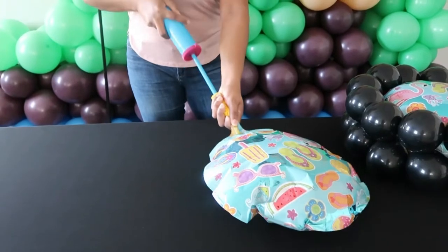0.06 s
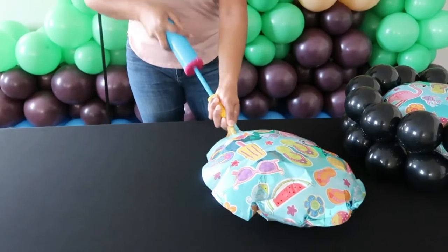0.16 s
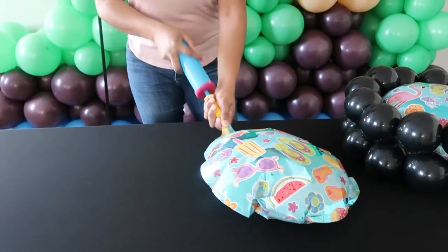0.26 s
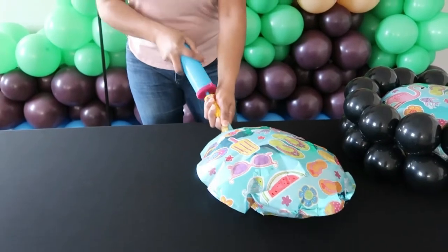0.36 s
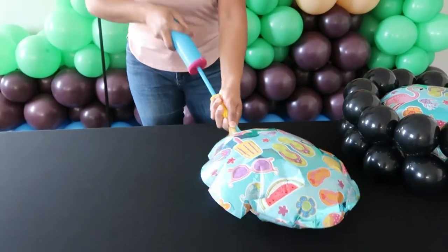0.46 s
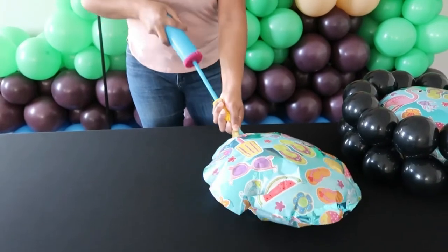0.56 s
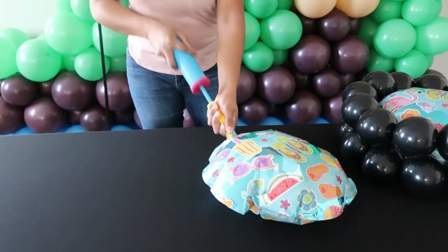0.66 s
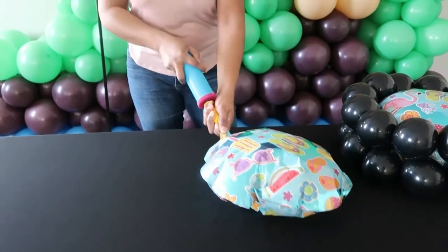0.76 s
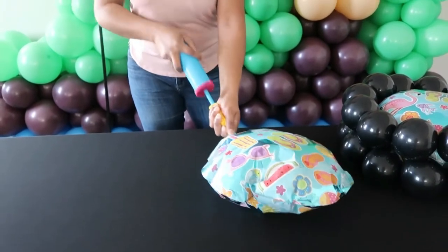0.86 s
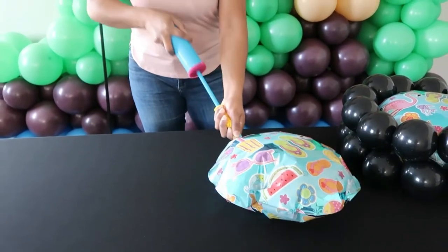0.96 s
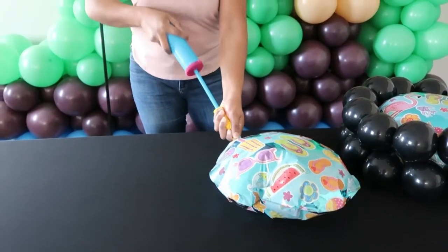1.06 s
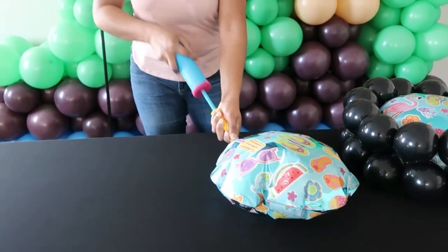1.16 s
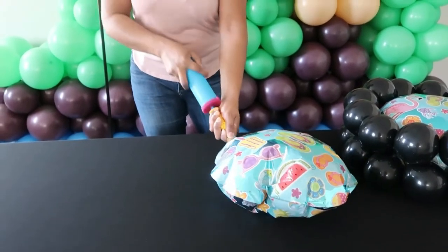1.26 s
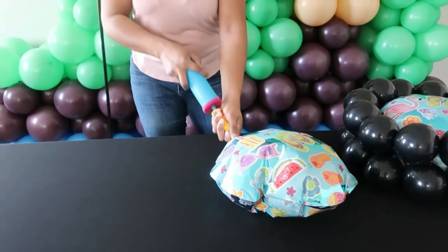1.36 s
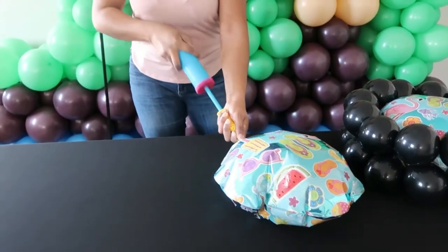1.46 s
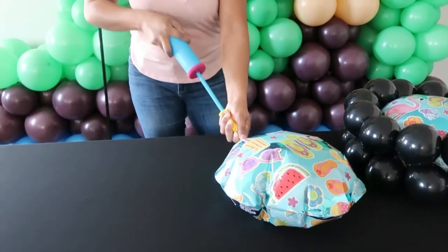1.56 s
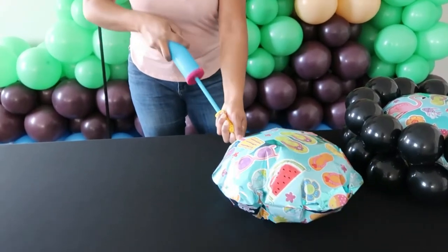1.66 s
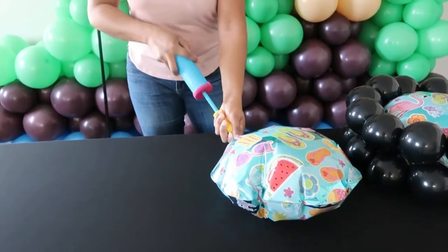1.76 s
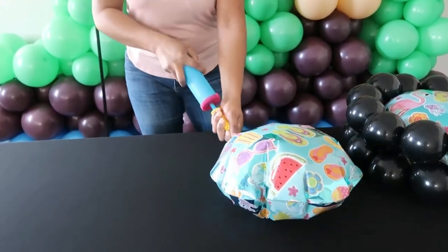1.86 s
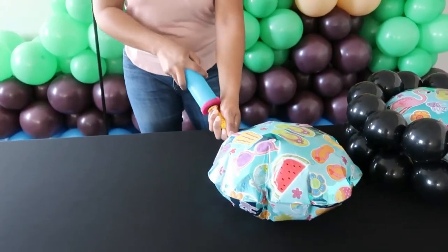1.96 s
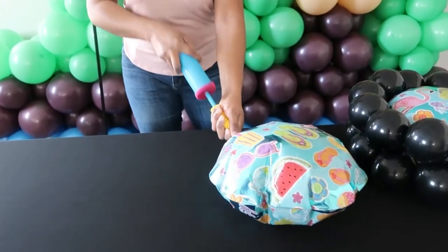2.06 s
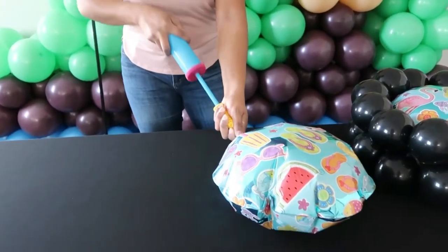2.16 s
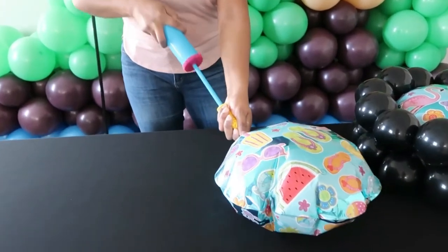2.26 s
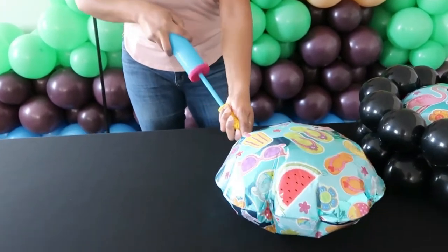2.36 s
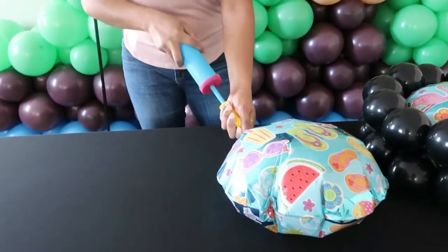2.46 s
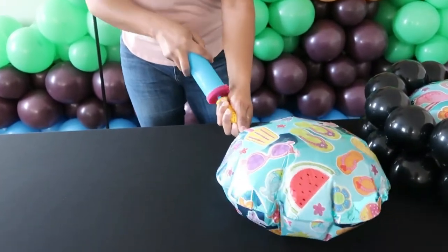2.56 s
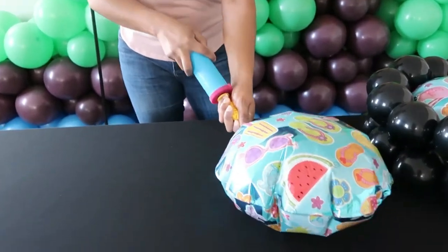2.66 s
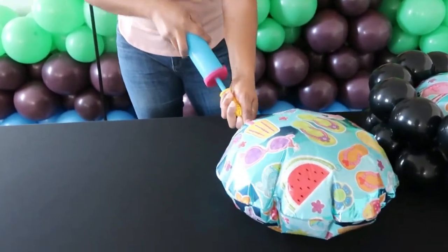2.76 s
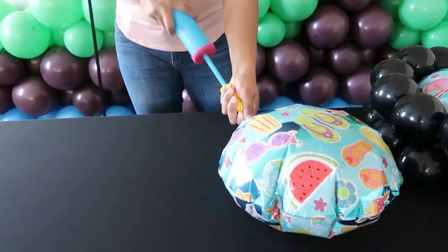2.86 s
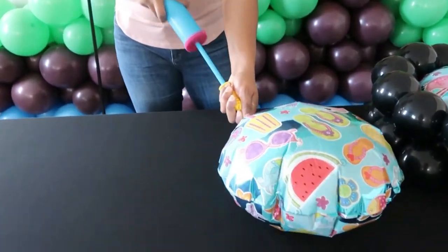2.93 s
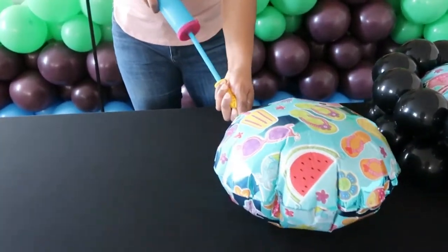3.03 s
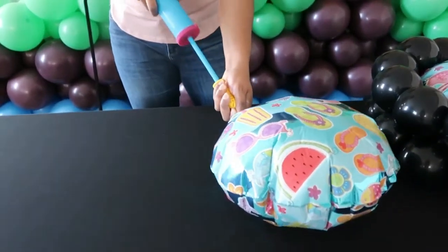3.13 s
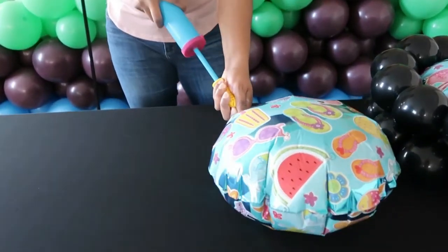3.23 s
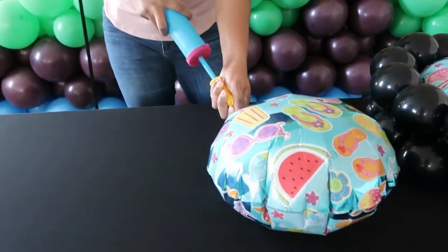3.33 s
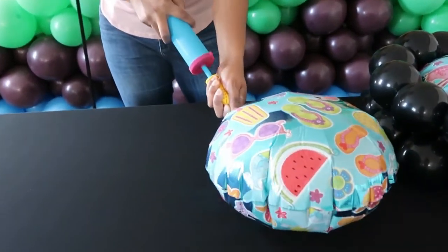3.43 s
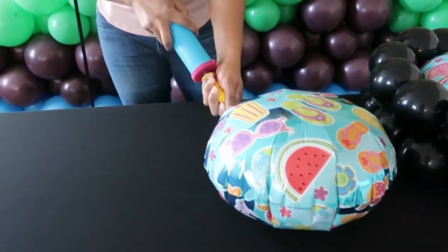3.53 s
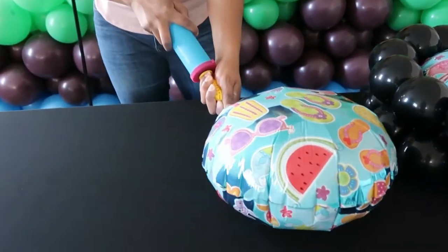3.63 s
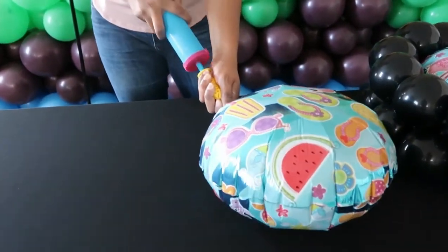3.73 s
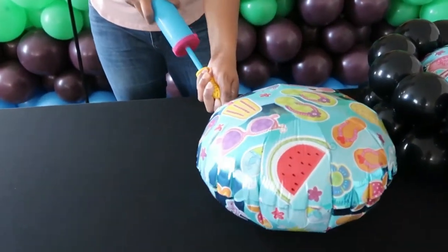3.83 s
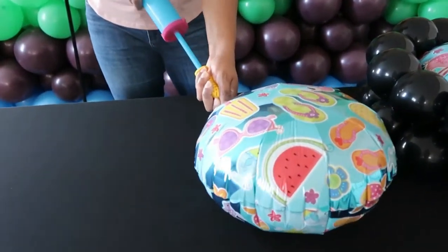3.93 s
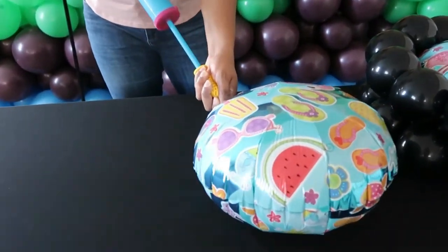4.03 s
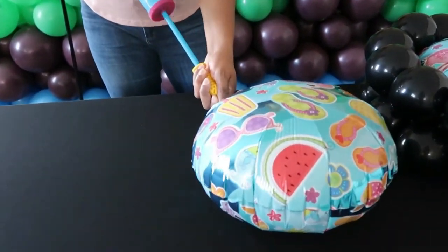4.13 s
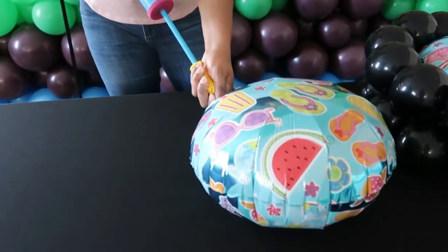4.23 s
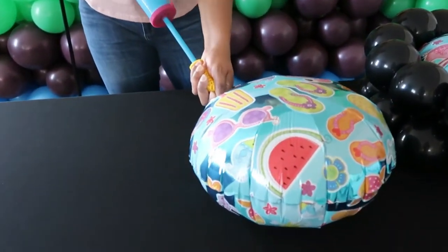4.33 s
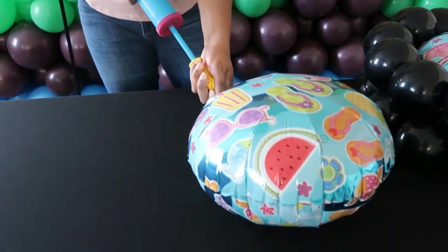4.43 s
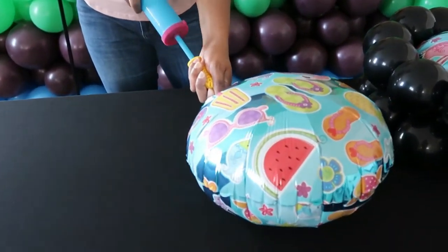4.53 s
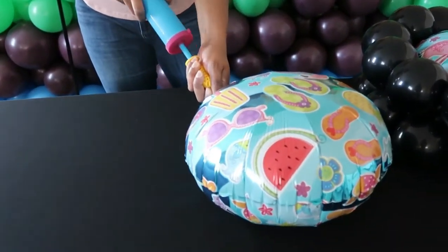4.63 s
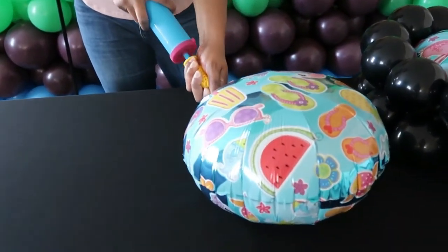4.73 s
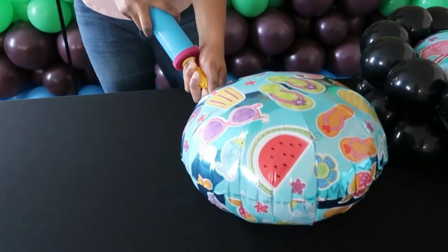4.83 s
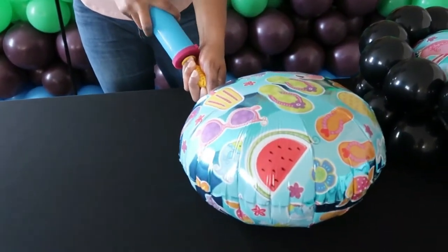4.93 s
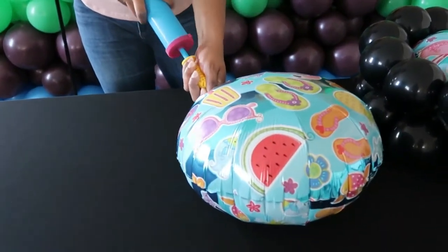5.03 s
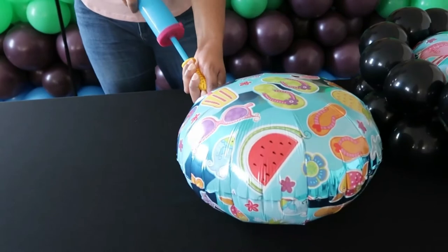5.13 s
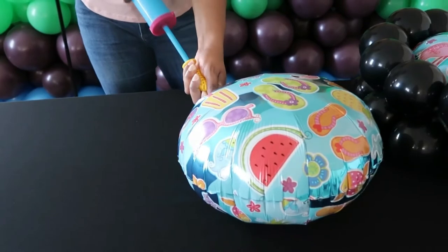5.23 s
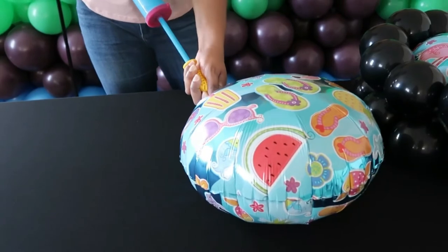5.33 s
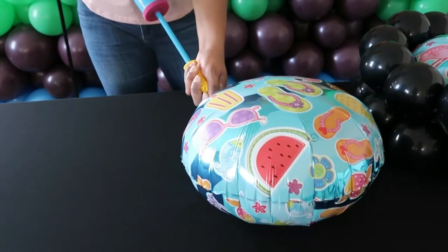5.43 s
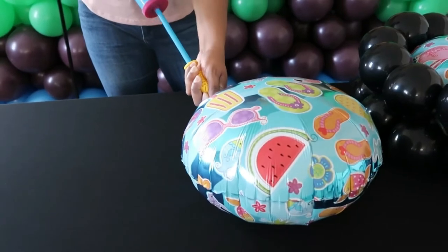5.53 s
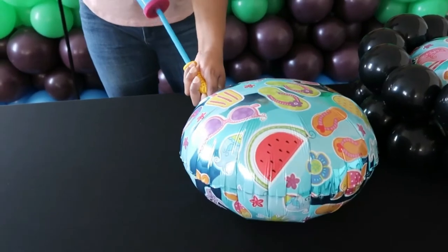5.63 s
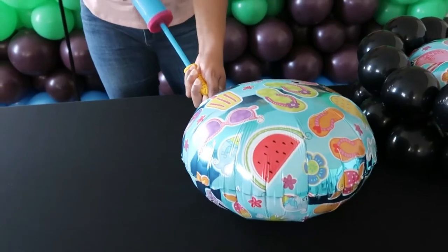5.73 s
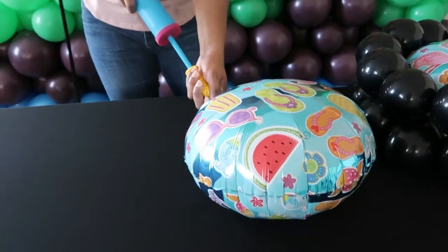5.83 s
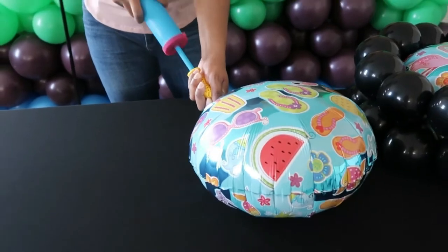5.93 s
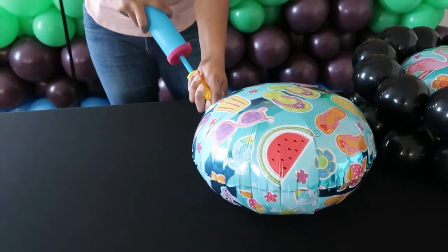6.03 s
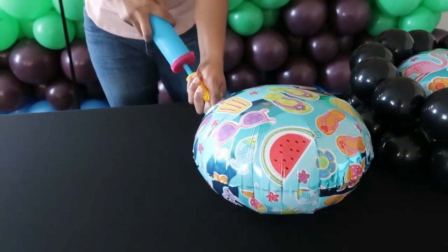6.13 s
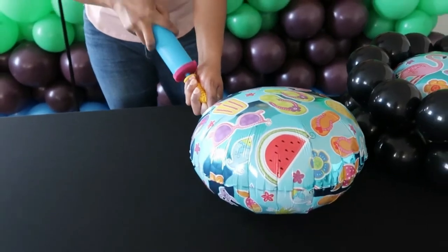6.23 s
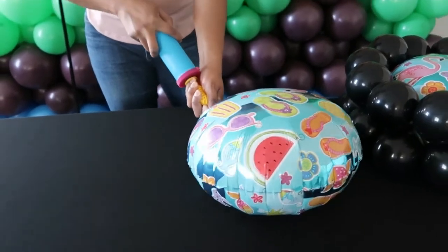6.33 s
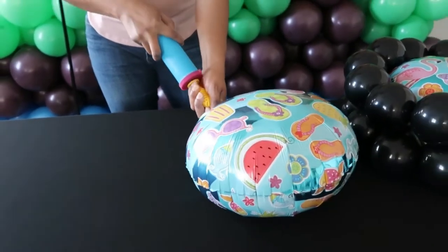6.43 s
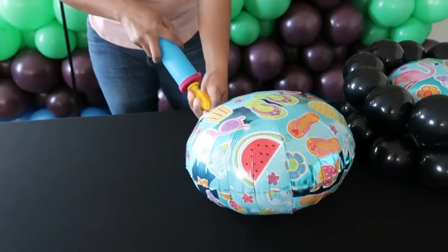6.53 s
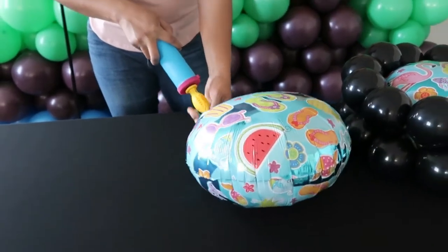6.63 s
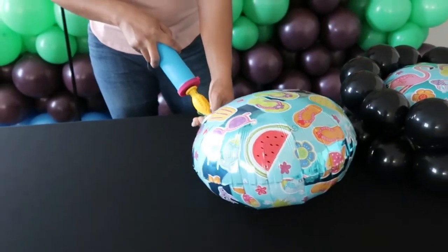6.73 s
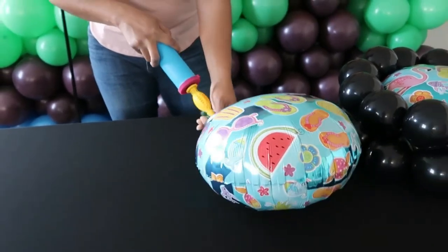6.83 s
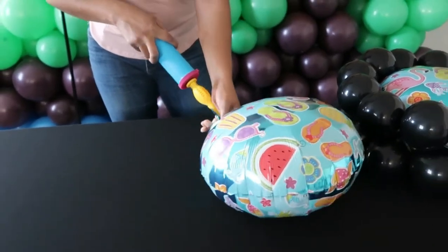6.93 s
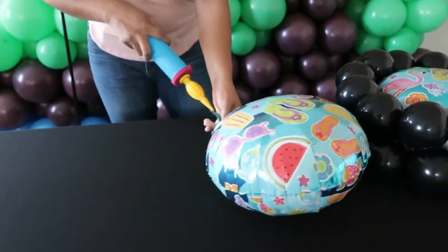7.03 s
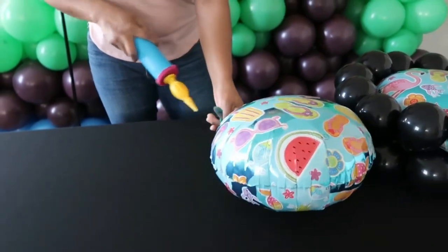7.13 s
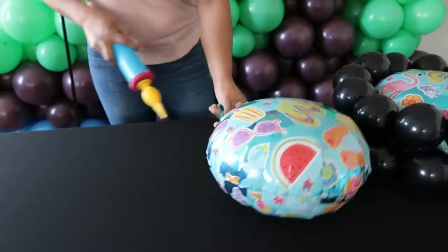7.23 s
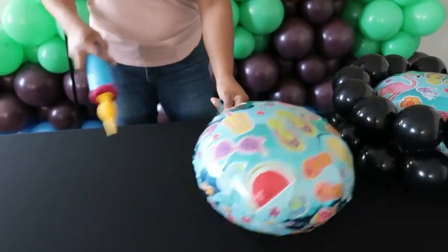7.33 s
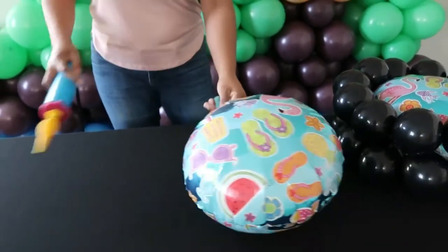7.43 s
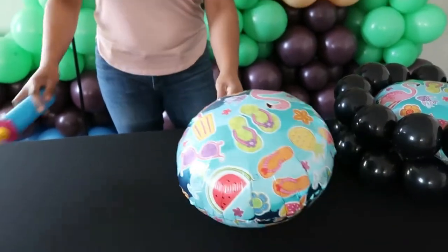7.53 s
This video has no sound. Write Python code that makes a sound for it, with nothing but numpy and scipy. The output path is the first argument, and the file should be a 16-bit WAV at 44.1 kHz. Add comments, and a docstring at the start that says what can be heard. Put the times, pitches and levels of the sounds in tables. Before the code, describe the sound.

A plastic hand pump huffs in quick airy strokes with hard knocks, then a foil balloon crackles and pops hollowly as it tightens, in a small room.

```python
"""First a hiss of air: a plastic hand pump strokes back and forth on a table in a small room, two microphones close.
Filtered noise makes the air; ringing modes and click sprays make piston knocks and valve slaps; the strokes slow.
From 2.8 s the foil balloon crackles and snaps out in hollow pops: paired modes, cracks and slips along the seam.
Thin dry snaps and short seam notes join in; late on, the nozzle scrapes and squeaks out of the neck.
Soft drum-like bumps of the full balloon close the scene, over the faint noise of a still room."""
import sys
import numpy as np
from scipy import signal
from scipy.fft import rfft, irfft, next_fast_len
from scipy.io import wavfile

SR = 44100
rng = np.random.default_rng(int(sys.argv[2]) if len(sys.argv) > 2 else 0)


def inscribe(sig):
    """Save sig as 16-bit PCM at rate SR to the path in sys.argv[1].

    A 1-D sig is mono; a 2-D sig holds one channel per row.
    Samples are clipped to [-1, 1] before scaling.
    """
    pcm = np.round(np.clip(np.atleast_2d(sig).T, -1, 1) * 32767)
    wavfile.write(sys.argv[1], SR, pcm.astype(np.int16))


N = 334258
TIME = np.arange(N) / SR
BRIEF = TIME[:SR // 3]

# Table levels are relative: each layer adds its own trim. Spectrum tables give shape only.
# pump strokes, pull and push by turns, weaker as pressure builds:
# start_s, length_s, air_db, change_over_stroke_db, valve_slap_db
STROKES = [(-0.02, 0.17, -35, 1, -52), (0.219, .19, -30.5, -1.5, -14), (0.458, 0.17, -31.5, -2, -19),
           (0.672, 0.17, -32, 1.5, -15), (0.908, 0.2, -34, -2, -22.5), (1.18, 0.23, -31, -7, -17.5),
           (1.471, 0.2, -33, -4.5, -16), (1.744, 0.25, -38.5, -0.5, -21), (2.124, 0.2, -34, -7, -11),
           (2.419, 0.28, -38.5, 0, -13.5), (2.817, 0.22, -39.5, 0, -22), (3.202, 0.25, -38, -7.5, -31),
           (3.411, 0.28, -45, 3.5, -29), (3.808, 0.37, -42, -11, -20.5), (4.349, 0.36, -48, -3.5, -22),
           (4.747, 0.21, -54, 5.5, -56), (5.085, 0.28, -39, -15.5, -38), (5.524, 0.095, -66, 12, -45),
           (5.771, 0.215, -45, -7, -51), (5.973, 0.3, -51.5, 3, -27)]
# the piston speeds up and slows within a stroke, most in a hard one: air_db, ends_below_middle_db
STROKE_ARCH = [(-40.5, 0.5), (-32, 8.5)]
AIR_RISE_DB_PER_S, AIR_FALL_DB_PER_S = 873, 150
# hiss of fast strokes: frequency_hz, level_db (per Hz)
FAST_HISS = [(60, -44), (210, -5), (350, -21), (650, -7.5), (850, -11.5), (2100, -8), (2650, -5.5),
             (3100, -3.5), (3600, -3.5), (4200, -7), (7000, -8.5), (8600, -13.5), (12500, -17),
             (14500, -25.5), (16000, -38)]
# hiss of slow strokes: frequency_hz, level_db (per Hz)
SLOW_HISS = [(60, -16), (200, 2.5), (650, 7.5), (850, 2.5), (1500, 3.5), (2200, 1), (3100, 1), (6000, -3.5),
             (8500, -10.5), (12000, -12), (15000, -26.5)]
# the intake sings only when pulled hard: air_db, resonance_against_air_db
INTAKE_SINGING = [(-34.5, -10), (-33, 2.5)]
# the intake's resonance climbs during each pull stroke and flutters
INTAKE_HZ, INTAKE_WIDTH_HZ, INTAKE_GLIDE_HZ_PER_S, INTAKE_FLUTTER_DB = 3220, 690, 2200, 4
# plastic knocks, mostly the piston against its end stop: start_s, thump_db, ping_db, clack_db
KNOCKS = [(0.162, -15, -20.5, -30), (0.384, -14, -42, -10.5), (0.615, -13.5, -15.5, -23),
          (1.084, -12, -14, -22.5), (1.4751, -50, -27, -21), (1.649, -14.5, -21, -25),
          (2.026, -25.5, -38, -28.5), (2.683, -15, -46, -18.5), (3.065, -17, -18.5, -25),
          (4.192, -20, -21.5, -24.5), (4.765, -56, -49, -23.5), (4.9, -56, -29, -22),
          (5.594, -21, -22, -29), (6.385, -50, -44, -24.5)]
# hard plastic clack: frequency_hz, level_db (per Hz)
CLACK = [(100, -44), (520, 5.5), (900, -14.5), (1800, -3.5), (2600, -0.5), (3700, -7.5), (4600, -12.5),
         (8000, -20.5), (15000, -45)]
# slap of the valve: frequency_hz, level_db (per Hz)
VALVE_SLAP = [(60, -5), (220, 6), (450, 5), (1300, 1), (2600, -6), (4000, -10), (14000, -26.5)]
# the skin's pitch and its panels' flop over time, tightest near 4.6 s and looser again later:
# time_s, pitch_hz, flop_db
TENSION = [(2.8, 446, -2.5), (3.3, 453, -6), (3.6, 537, -11.5), (3.95, 599, -16), (4.6, 770, -28),
           (5.2, 614, -11), (5.6, 570, -10.5), (6.3, 582, -15), (6.9, 524, -4.5)]
# flurries of small creases as the skin is stretched or gripped: start_s, length_s, level_db
FLURRIES = [(2.805, 0.24, -38.5), (3.215, 0.3, -34), (3.522, 0.19, -32.5), (3.866, 0.33, -33),
            (4.342, 0.14, -36), (4.593, 0.032, -27.5), (4.881, 0.068, -36), (5.132, 0.06, -30),
            (5.501, 0.098, -30.5), (5.784, 0.017, -27.5), (5.972, 0.019, -29), (6.07, 0.035, -26),
            (6.139, 0.025, -25.5), (6.176, 0.018, -28), (6.215, .022, -30.5), (6.248, 0.021, -25.5),
            (6.697, 0.43, -41.5), (7.012, 0.096, -42.5)]
FLURRY_FADE_DB, FLURRY_RISE_DB_PER_S, FLURRY_FALL_DB_PER_S = -8, 1600, 305
# the loudest creases snapping out of the foil: start_s, pop_db, pitch_hz, t60_s, crack_db
POPS = [(2.8496, -19, 447, 0.015, -43), (2.885, -25.5, 300, 0.013, -34), (2.9153, -18.5, 397, 0.009, -32),
        (2.937, -27, 450, 0.025, -29.5), (2.956, -21.5, 520, 0.0075, -36), (3.013, -18.5, 498, 0.017, -34),
        (3.215, -20, 545, 0.014, -25.5), (3.2422, -22, 452, 0.015, -26.5), (3.2651, -24, 540, 0.0079, -36),
        (3.2801, -16.5, 426, 0.008, -34), (3.2957, -26, 470, 0.0084, -32), (3.408, -16, 390, 0.016, -41),
        (3.429, -21, 467, .018, -33), (3.4616, -13.5, 515, 0.022, -14), (3.4753, -9, 512, 0.017, -28),
        (3.5085, -13, 487, 0.023, -24.5), (3.5634, -23.5, 495, 0.11, -25),
        (3.6408, -9.5, 563, 0.0081, -20.5), (3.647, -21.5, 886, 0.0069, -25),
        (3.813, -24, 940, 0.0024, -33), (3.8497, -33, 1130, .012, -21.5), (3.8636, -14.5, 600, 0.011, -26),
        (3.871, -22.5, 630, 0.025, -37), (3.8775, -17.5, 420, 0.0093, -34),
        (3.9231, -18.5, 494, 0.035, -30), (3.9425, -16, 583, 0.0033, -22), (4.0267, -24.5, 558, 0.047, -40),
        (4.0599, -30, 610, 0.025, -38), (4.087, -27, 564, 0.027, -50), (4.3087, -27.5, 586, 0.025, -30.5),
        (4.3502, -34, 800, 0.02, -26.5), (4.3902, -25, 490, 0.022, -20.5),
        (4.5281, -26.5, 786, 0.013, -34.5), (4.765, -28.5, 705, 0.014, -28),
        (4.7647, -24, 1760, 0.014, -35), (4.872, -36, 574, 0.052, -25.5), (5.0872, -26.5, 555, 0.02, -29),
        (5.103, -21.5, 540, 0.014, -40), (5.1252, -13, 900, 0.014, -15.5), (5.1278, -16, 503, 0.011, -34),
        (5.1994, -24, 1050, 0.031, -24), (5.2474, -28.5, 880, 0.018, -34.5),
        (5.4997, -27.5, 466, 0.016, -40), (5.5385, -28, 413, 0.018, -35),
        (5.7635, -29.5, 584, 0.014, -26.5), (5.7829, -22.5, 550, 0.02, -23),
        (5.9776, -20.5, 493, 0.024, -24), (6.0676, -24, 550, 0.012, -27), (6.1417, -26, 496, 0.018, -27),
        (6.1791, -26.5, 513, 0.041, -21), (6.219, -25, 581, 0.037, -23.5),
        (6.254, -22.5, 510, 0.018, -23.5), (6.71, -40, 468, .04, -42), (7.02, -33, 524, 0.019, -36),
        (7.0639, -31.5, 630, 0.033, -26), (7.131, -33, 553, .022, -42), (7.3485, -38.5, 860, 0.011, -50)]
# sharp edge of a foil snap: frequency_hz, level_db (per Hz)
CRACK = [(100, -7), (500, -7.5), (1000, 10.5), (1700, 6), (2600, 2.5), (4000, -1.5), (7000, -11.5),
         (12000, -16.5), (15500, -25)]
# how strongly one snap sets off its neighbours along a tight seam: time_s, level_against_first_db
CASCADE = [(3.3, -19), (3.7, -12.5), (4.6, -17), (5.3, -17), (5.8, -2), (6.3, -2), (7.1, -5.5)]
# thin dry snaps of the foil and its neck: start_s, level_db, centre_hz
SNAPS = [(3.156, -21, 2590), (3.517, -15.5, 4850), (3.57, -21, 3800), (4.108, -28, 3150),
         (4.3960, -17, 3300), (4.596, -24.5, 5170), (4.9157, -20, 3400), (5.0907, -21, 3570),
         (5.596, -20, 4300), (6.385, -24, 2980), (6.7922, -20, 4850), (7.2682, -29, 3600)]
# spectrum of such a snap: multiple_of_centre (no unit), level_db (per Hz)
SNAP_SHAPE = [(.1, -4), (.5, -11), (1, 4), (1.8, -5.5), (3.5, -17)]
# a tight seam slips and sings for a moment: start_s, length_s, level_db, first_hz, last_hz
CREAKS = [(3.955, 0.008, -21.5, 600, 585), (4.172, 0.0053, -24, 674, 636), (4.462, 0.02, -23.5, 632, 602),
          (5.128, 0.057, -22.5, 545, 538)]
CREAK_RISE_DB_PER_S, CREAK_FALL_DB_PER_S, CREAK_FADE_DB = 9000, 556, -6.5
# the nozzle rubs in the balloon's neck as it is worked loose: start_s, length_s, level_db
RUBS = [(6.408, 0.042, -41), (6.492, 0.019, -37), (6.595, 0.12, -46.5), (6.703, 0.27, -47),
        (6.876, 0.14, -41), (7.007, 0.024, -44), (7.039, 0.029, -43.5), (7.128, 0.053, -46),
        (7.214, 0.2, -47)]
RUB_ARCH_DB, RUB_FADE_DB, RUB_RISE_DB_PER_S, RUB_FALL_DB_PER_S = 8.5, -6, 701, 220
# plastic scraping on foil: frequency_hz, level_db (per Hz)
SCRAPE = [(60, -8), (300, -10), (530, 10), (740, -9), (930, 7), (1250, -2), (2300, -2), (3800, -1),
          (5500, -5.5), (8000, -10.5), (11500, -10.5), (15000, -23)]
# the squeak of the nozzle as it leaves the neck
SQUEAK_AT_S, SQUEAK_LENGTH_S, SQUEAK_HZ, SQUEAK_WIDTH_HZ, SQUEAK_DB = 7.035, 0.05, 4150, 550, -44.5
# soft bumps of the full balloon: start_s, level_db, pitch_hz, t60_s
BUMPS = [(6.804, -33.5, 260, 0.036), (7.012, -30.5, 106.8, 0.025), (7.44, -29, 121, 0.031),
         (7.45, -34.5, 274, 0.041), (7.458, -32, 485, 0.068), (7.456, -37, 140, 0.9),
         (7.471, -34, 210.5, 0.25)]
# still room: frequency_hz, level_db (per Hz)
ROOM_NOISE = [(20, -17), (60, 7), (90, 2), (170, 1.5), (330, -1), (520, -8), (1000, -16), (3000, -21.5),
              (8000, -29), (15000, -28)]
# width of the diffuse room noise: frequency_hz, side_against_mid_db
ROOM_NOISE_WIDTH = [(60, -19), (200, -4), (1300, 5), (4400, 5), (9000, 3)]
# decay of the small room: frequency_hz, t60_s
ROOM_DECAY = [(150, 0.58), (530, 0.34), (1400, 0.49), (3700, 0.21), (10000, 0.098)]
# width heard by two close microphones: frequency_hz, side_against_mid_db
CLOSE_WIDTH = [(60, -80), (250, -44), (700, -21.5), (1300, -21), (2400, -15), (4400, -6.5), (8000, -2.5),
               (15000, 0.8)]
BAND_EDGE_HZ = 15800


def amp(db):
    """Decibels to gain."""
    return 10 ** (np.asarray(db) / 20)


def unit(x):
    """Scales to rms 1."""
    return x / np.sqrt(np.mean(x ** 2) + 1e-20)


def read(points, hz):
    """Reads a spectrum table on a log-frequency axis."""
    f, value = np.transpose(points)
    return np.interp(np.log(hz + 1), np.log(f + 1), value)


def follow(rows, t=TIME):
    """Reads a two-column control curve at the positions t."""
    return np.interp(t, *np.transpose(rows))


def add(mix, s, sound):
    """Mixes a sound in at s seconds."""
    part = mix[..., max(round(s * SR), 0):][..., :sound.shape[-1]]
    part += sound[..., :part.shape[-1]]


def colour(x, spectrum, size=2048):
    """Causal minimum-phase filter with the given spectrum and unit energy."""
    log_gain = np.log(amp(read(spectrum, abs(np.fft.fftfreq(size, 1 / SR)))))
    taps = np.fft.ifft(np.exp(np.conj(signal.hilbert(log_gain)))).real
    taps = taps / np.linalg.norm(taps)
    return signal.oaconvolve(x, taps[None], axes=1)[:, :x.shape[1]]


def noise(spectrum):
    """Steady coloured noise, mid and side."""
    return colour(rng.standard_normal((2, N)), spectrum)


def drift(rate_hz):
    """Slow random wander of rms 1."""
    smooth = signal.butter(2, rate_hz, fs=SR, output="sos")
    return unit(signal.sosfilt(smooth, rng.standard_normal(N)))


def clicks(per_s, spread_db):
    """A random train of clicks of uneven size and sign."""
    size = amp(spread_db * np.minimum(rng.exponential(1, N), 3)) * rng.choice([-1, 1], N)
    return size * (rng.random(N) < per_s / SR)


def ring(hz, t60, rise, t=TIME[:SR // 6]):
    """One dying mode with a soft start, peak 1; t60 and rise in seconds."""
    wave = np.sin(2 * np.pi * hz * t) * amp(-60 * t / t60) * (1 - np.exp(-(t / rise) ** 2))
    return wave / abs(wave).max()


def burst(spectrum, t60, size=4096):
    """A contact click and its short spray of micro-impacts, mid and side, peaking near 1."""
    spray = rng.standard_normal((2, size)) * amp(-60 * TIME[:size] / t60)
    spray[:, 0] = 4.5  # the contact click
    spray = colour(spray, spectrum)
    energy = (spray ** 2).sum(1, keepdims=True)
    return spray / (2.85 * np.sqrt(energy * 2 * np.log(1000) / (t60 * SR)))


def swell(start, length, arch_db, fade_db, rise, fall):
    """Gain of one movement: quick rise, arched hold that fades, release; rise and fall in dB per second."""
    u = np.clip((TIME - start) / length, 0, 1)
    outside_db = rise * np.maximum(start - TIME, 0) + fall * np.maximum(TIME - start - length, 0)
    return amp(np.maximum(fade_db * u - arch_db * (2 * u - 1) ** 2 - outside_db, -150))


def whistle(hz, width_hz):
    """Turbulence in one narrow resonance, steady or moving: low-passed noise shifted up to hz, mid and side."""
    smooth = signal.butter(2, width_hz / 2, fs=SR, output="sos")
    a, b = signal.sosfilt(smooth, rng.standard_normal((2, 2, N)))
    phase = 2 * np.pi * np.cumsum(hz * np.ones(N)) / SR
    return unit(a * np.cos(phase) + b * np.sin(phase))


def background():
    """The quiet, diffuse noise of the still room, spread wider than the close sounds."""
    return stereo(amp(-52.0) * noise(ROOM_NOISE), ROOM_NOISE_WIDTH)


def flow_db(strokes, idle_db):
    """Level of the air moved by these strokes, over a faint idle hiss; powers add."""
    power = amp(idle_db) ** 2
    for s, length, db, change_db, _ in strokes:
        arch_db = follow(STROKE_ARCH, db)
        gain = amp(db) * swell(s, length, arch_db, change_db, AIR_RISE_DB_PER_S, AIR_FALL_DB_PER_S)
        power = power + gain ** 2
    return 10 * np.log10(power)


def intake_hz():
    """The intake's pitch, rising through each pull stroke."""
    hz = np.full(N, float(INTAKE_HZ))
    for s, length, *_ in STROKES[::2]:
        from_middle_s = np.minimum(TIME - s, length) - length / 2
        hz = np.where(TIME < s, hz, INTAKE_HZ + INTAKE_GLIDE_HZ_PER_S * from_middle_s)
    return hz


def air(soft_db=-41.5, hard_db=-33.0):
    """Turbulence in the pump; the harder the push, the more the valve resonance near 3 kHz stands out."""
    level_db = flow_db(STROKES, idle_db=-56.5)
    vigour = np.clip((level_db - soft_db) / (hard_db - soft_db), 0, 1)
    fast = np.sqrt(vigour) * amp(6.5) * noise(FAST_HISS)
    slow = np.sqrt(1 - vigour) * amp(4.0) * noise(SLOW_HISS)
    # a strong flow is smooth; a weak one is grainy with the rubbing of plastic
    grainy = np.interp(level_db, [-47, -38], [.5, .02])
    grains = np.array([clicks(per_s=1500, spread_db=4.5) for _ in range(2)])
    rubbing = amp(5.0) * unit(colour(grains, SLOW_HISS))
    flow = np.sqrt(1 - grainy) * (fast + slow) + np.sqrt(grainy) * rubbing
    flow = flow * amp(level_db + .5 * drift(rate_hz=50))
    pull_db = flow_db(STROKES[::2], idle_db=-90.0)
    intake = amp(pull_db + follow(INTAKE_SINGING, pull_db)) * whistle(intake_hz(), INTAKE_WIDTH_HZ)
    return flow + intake * amp(INTAKE_FLUTTER_DB * drift(rate_hz=29))


def clacks_and_slaps(valve_rise_s=0.0026):
    """The plastic parts clack at each knock; the valve slaps, with a softer start, at each turn."""
    out = np.zeros((2, N))
    for s, _, _, clack_db in KNOCKS:
        add(out, s, amp(clack_db + 2.0) * burst(CLACK, t60=0.11))
    soft_start = 1 - np.exp(-BRIEF / valve_rise_s)
    for s, _, _, _, valve_db in STROKES:
        slap = burst(VALVE_SLAP, t60=0.098, size=len(BRIEF)) * soft_start
        add(out, s, amp(valve_db + 4.0) * slap)
    return out


def knocks(thump_hz=212, ping_hz=1205, thump_t60=0.018, ping_t60=0.038, lowest_hz=120):
    """The piston thumps the air column and pings the barrel; a high-pass keeps the thumps dry in the bass."""
    out = np.zeros((2, N))
    for s, thump_db, ping_db, _ in KNOCKS:
        add(out, s, amp(thump_db - 3.0) * ring(thump_hz, thump_t60, rise=0.0042))
        add(out, s, amp(ping_db - 5.0) * ring(ping_hz, ping_t60, rise=0.0003))
    return signal.sosfilt(signal.butter(2, lowest_hz, "highpass", fs=SR, output="sos"), out)


def stretch():
    """How busy the small creases are: each flurry starts at once and settles; powers add."""
    power = 0
    for s, length, db in FLURRIES:
        shape = swell(s, length, 0, FLURRY_FADE_DB, FLURRY_RISE_DB_PER_S, FLURRY_FALL_DB_PER_S)
        power = power + (amp(db) * shape) ** 2
    return np.sqrt(power)


def crinkle(per_s=230, scatter=0.23, cycles=6.9, grain_db=4.5, flop_hz=185, upper_db=-6.0, count=1150):
    """Small creases give way: hollow grains near the skin's pitch, dull flops while slack, fine ticks."""
    out = np.zeros(N)
    start, end = TENSION[0][0], TIME[-1]
    when, pitch_hz, flop_db = np.transpose(TENSION)
    t = TIME[:SR // 40]
    for k, (late, detune, size, sign, panel, edge) in enumerate(rng.standard_normal((count, 6))):
        s = start + (k + late) / per_s
        hz = np.interp(s, when, pitch_hz) * np.exp(scatter * detune)
        hollow = ring(hz, cycles / hz, rise=0.00051, t=t)
        edge_hz = 1600 * np.exp(2 * scatter * np.tanh(edge))  # the fold's stiff edge
        stiff = amp(upper_db) * ring(edge_hz, t60=0.0027, rise=.0001, t=t)
        flop = ring(flop_hz * np.exp(0.27 * panel), t60=0.028, rise=0.0024, t=t)
        flop = amp(np.interp(s, when, flop_db)) * flop
        add(out, s, np.sign(sign) * amp(grain_db * min(size, 2)) * (hollow + stiff + flop))
    active = (TIME > start) & (TIME < end)
    ticks = colour(np.array([clicks(per_s=260, spread_db=5.5)] * 2), CRACK)
    return (amp(-2.5) * out / out[active].std() + amp(-11.5) * unit(ticks)) * stretch()


def pops(upper_hz=920, upper_db=-4.5, scatter=0.17, slip_gap_s=.0055, fade_db=-1.5,
         panel_hz=195, panel_db=2.5, count=6):
    """A crease flips with a crack and its panel swings in two modes; slips run on along the seam."""
    out, t = np.zeros((2, N)), TIME[:SR // 20]
    slack_curve = [(when, slack_db) for when, _, slack_db in TENSION]
    for s, db, hz, t60, crack_db in POPS:
        add(out, s, amp(db + 3.0) * ring(hz, t60, rise=0.00047))
        upper = ring(upper_hz * np.exp(scatter * rng.normal()), t60=0.0091, rise=0.0002, t=t)
        add(out, s, amp(db + upper_db) * upper)
        flop_db = follow(slack_curve, s)  # a slack panel flops as it flips
        flop = ring(panel_hz * np.exp(scatter * rng.normal()), t60=0.017, rise=0.00099, t=t)
        add(out, s, amp(db + flop_db + panel_db) * flop)
        cascade_db = follow(CASCADE, s)
        lead = 1 - amp(min(cascade_db, 0)) / 2  # a seam that runs on gives way more gently
        add(out, s, lead * amp(crack_db + 10.5) * burst(CRACK, t60=0.019, size=len(t)))
        for k, (detune, late, sharp) in enumerate(rng.standard_normal((count, 3))):
            shift = np.exp(scatter * detune)
            low = ring(hz * shift, t60=0.023, rise=0.00034, t=t)
            high = ring(upper_hz * shift, t60=0.023, rise=0.00034, t=t)
            crack = amp(crack_db + 7.0 * np.tanh(sharp)) * burst(CRACK, t60=0.012, size=len(t))
            slip = amp(db) * (low + amp(upper_db) * high) + crack
            slip_s = s + slip_gap_s * (k + 1 + np.tanh(late) / 2)
            add(out, slip_s, amp(cascade_db + fade_db * k) * slip)
    return out


def balloon(x, slack_hz=110, taut_hz=260):
    """Slack panels move as a whole and give bass; a taut skin only lets small patches move."""
    when, _, flop_db = np.transpose(TENSION)
    slack = amp(np.minimum(np.interp(TIME, when, flop_db), 0) / 2)
    loose, tight = (signal.butter(2, hz, "highpass", fs=SR, output="sos") for hz in (slack_hz, taut_hz))
    return slack * signal.sosfilt(loose, x) + (1 - slack) * signal.sosfilt(tight, x)


def snaps(t60=0.018):
    """Tiny folds flick over, too small to set a panel swinging: a click spray around one centre."""
    out = np.zeros((2, N))
    for s, db, centre_hz in SNAPS:
        spectrum = [(centre_hz * multiple, gain_db) for multiple, gain_db in SNAP_SHAPE]
        add(out, s, amp(db) * burst(spectrum, t60))
    return out


def creaks(waver=0.012):
    """A seam sticks and slips in step with its panel: a short hollow note that sags as the fold relaxes."""
    out = np.zeros(N)
    unsteady = 1 + waver * drift(rate_hz=110)
    for s, length, db, first_hz, last_hz in CREAKS:
        hz = np.interp(TIME, [s, s + length], [first_hz, last_hz]) * unsteady
        phase = 2 * np.pi * np.cumsum(hz) / SR
        gain = amp(db) * swell(s, length, 0, CREAK_FADE_DB, CREAK_RISE_DB_PER_S, CREAK_FALL_DB_PER_S)
        out += gain * np.sin(phase)
    return np.array([out, out])


def nozzle(smooth_db=0.0, grain_db=-1.0):
    """The nozzle is worked out of the neck in short grainy scrapes and leaves it with a squeak."""
    grip = (RUB_ARCH_DB, RUB_FADE_DB, RUB_RISE_DB_PER_S, RUB_FALL_DB_PER_S)
    rubs = sum(amp(db) * swell(s, length, *grip) for s, length, db in RUBS)
    slips = colour(np.array([clicks(per_s=1400, spread_db=6.0) for _ in range(2)]), SCRAPE)
    scrape = amp(smooth_db) * noise(SCRAPE) + amp(grain_db) * unit(slips)
    scrape = scrape * rubs * amp(2.8 * drift(rate_hz=35))
    squeak = swell(SQUEAK_AT_S, SQUEAK_LENGTH_S, *grip) * whistle(SQUEAK_HZ, SQUEAK_WIDTH_HZ)
    return scrape + amp(SQUEAK_DB) * squeak


def bumps():
    """Handled and let go, the taut balloon booms like a soft drum: dying modes with soft starts."""
    out = np.zeros((2, N))
    for s, db, hz, t60 in BUMPS:
        add(out, s, amp(db) * ring(hz, t60, rise=0.0025))
    return out


def echoes(early_db, tail_db, early_t60=0.077):
    """Quick scatter from the table and nearby things, then a short tail."""
    sparse = rng.random((2, 2, len(BRIEF))) < .12
    taps = rng.choice([-1., 1.], (2, 2, len(BRIEF))) * sparse
    early = taps[0] * amp(-60 * BRIEF / early_t60) * (BRIEF > .002)
    hz, t, z = signal.stft(taps[1] * (BRIEF > .008), SR, nperseg=256)
    decay = amp(-60 * t / read(ROOM_DECAY, hz)[:, None])  # each band dies at its own rate
    tail = signal.istft(z * decay, SR, nperseg=256)[1][:, :len(BRIEF)]
    return (amp(early_db) * unit(early) + amp(tail_db) * unit(tail)) / np.sqrt(len(BRIEF))


def room(x, early_db, tail_db, count):
    """Pump and balloon keep moving, so the sound glides through several echo patterns in turn."""
    out = x.copy()
    place = TIME * 11  # echo patterns passed, 11 per second
    for k in range(count):
        share = np.sin(np.pi / 2 * np.minimum((place - k) % count, 2))
        out += signal.oaconvolve(x * share, echoes(early_db, tail_db), axes=1)[:, :N]
    return out


def stereo(mid_side, width):
    """Mid and side to left and right; the two microphones differ in phase, mostly in the treble."""
    mid, side = mid_side
    size = next_fast_len(N)
    side_gain = 1j * amp(read(width, np.fft.rfftfreq(size, 1 / SR)))  # 1j: a quarter turn of phase
    side = irfft(rfft(side, size) * side_gain, size)[:N]
    return np.array([amp(-0.82) * (mid + side), amp(-0.44) * (mid - side)])


def scene():
    """Popping panels stir the room more than the pump, nozzle and small folds; quiet noise lies below."""
    small = air() + clacks_and_slaps() + snaps() + creaks() + nozzle() + bumps()
    close = room(small, early_db=-14.0, tail_db=-14.0, count=2)
    piston = room(knocks(), early_db=-11.0, tail_db=-14.0, count=3)
    foil = room(balloon(crinkle() + pops()), early_db=-5.0, tail_db=-12.0, count=4)
    return stereo(close + piston + foil, CLOSE_WIDTH) + background()


def record(dry):
    """The recorder's band limit: a steep low-pass."""
    taps = signal.firwin(511, BAND_EDGE_HZ, window=("kaiser", 9), fs=SR)
    return signal.oaconvolve(dry, taps[None], "same")


dry = scene()
out = record(dry)
inscribe(out)
```